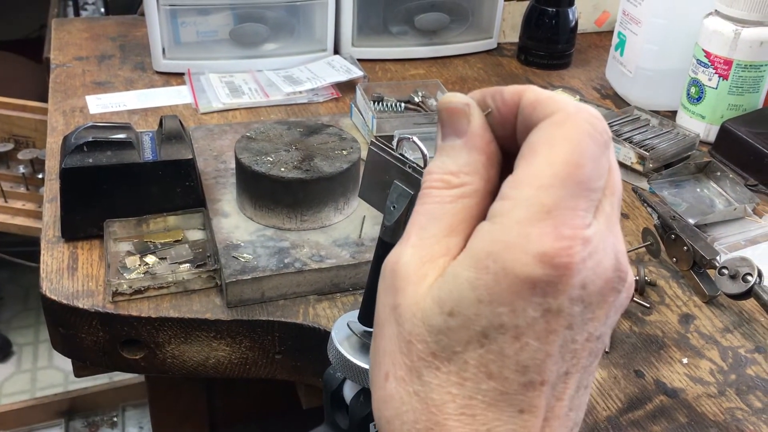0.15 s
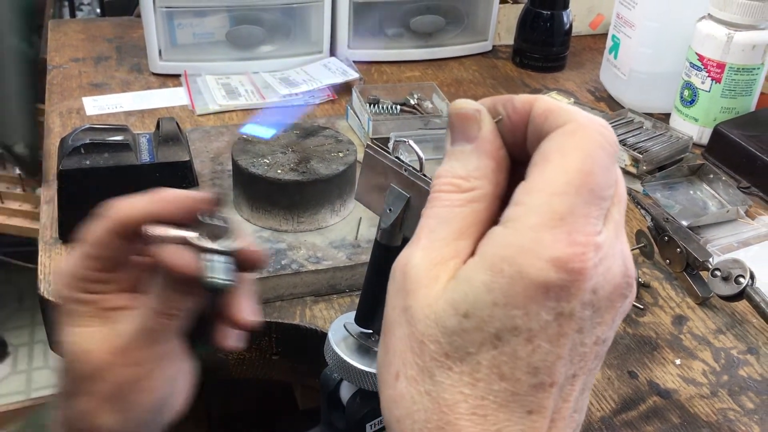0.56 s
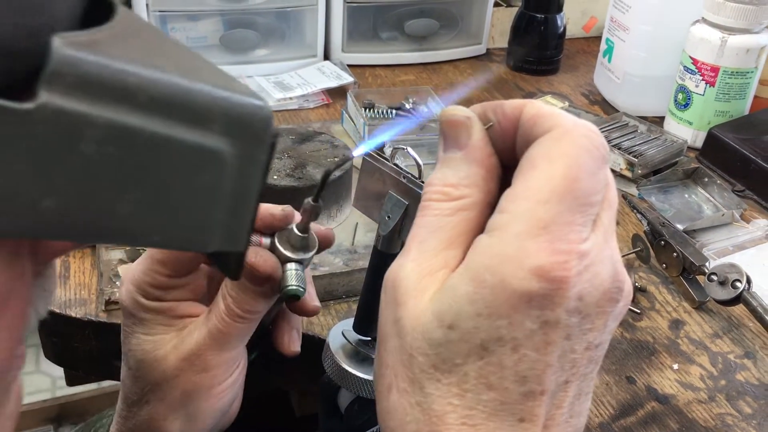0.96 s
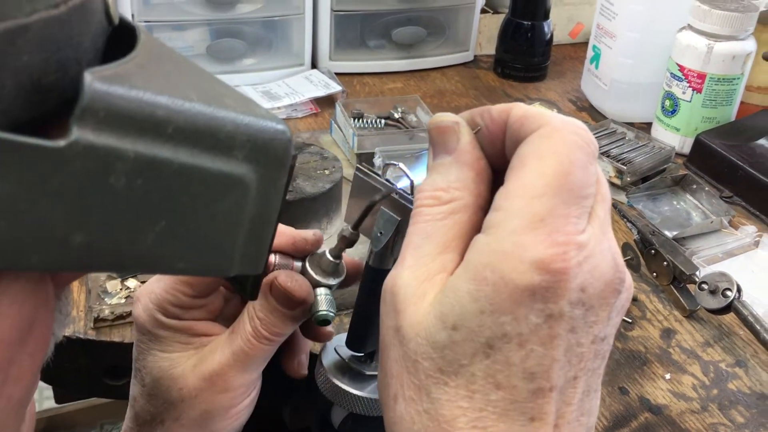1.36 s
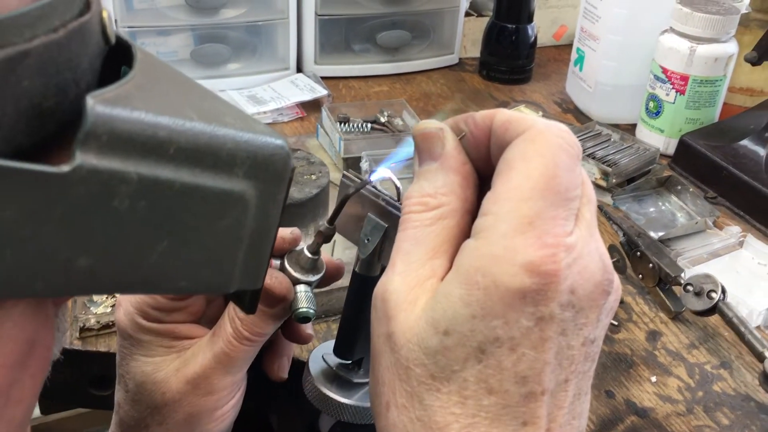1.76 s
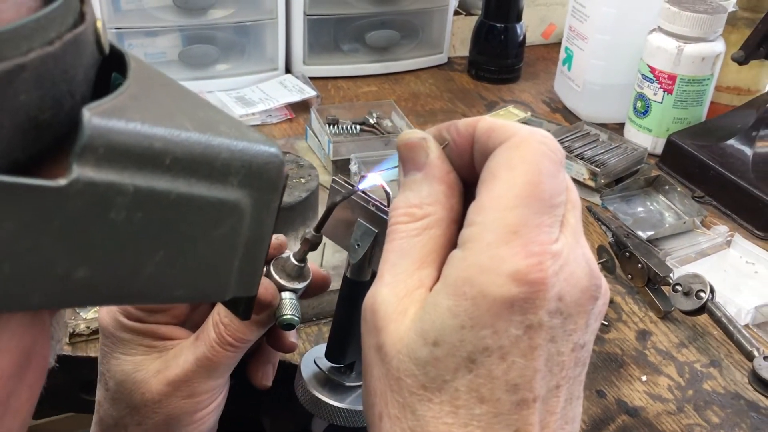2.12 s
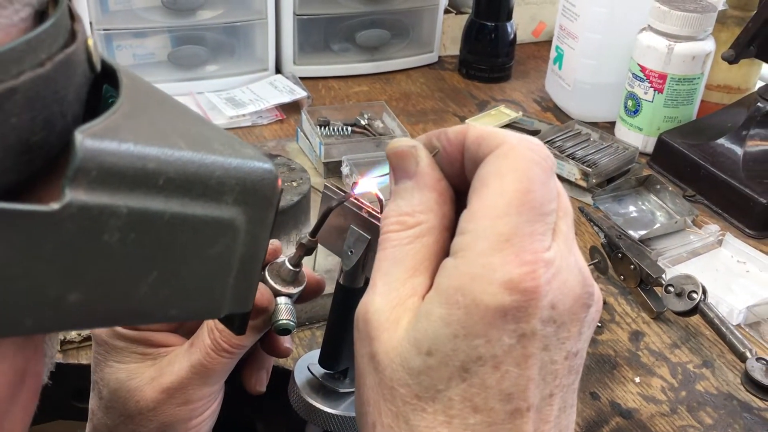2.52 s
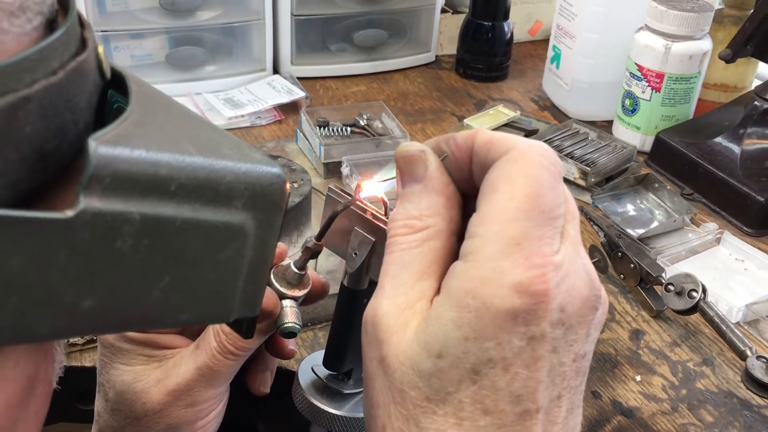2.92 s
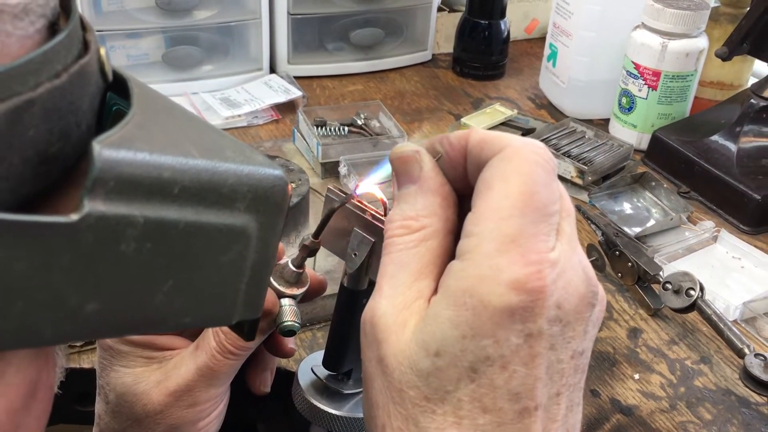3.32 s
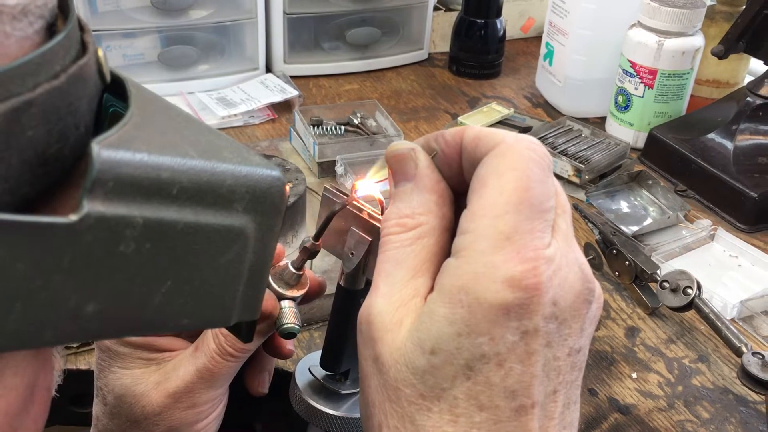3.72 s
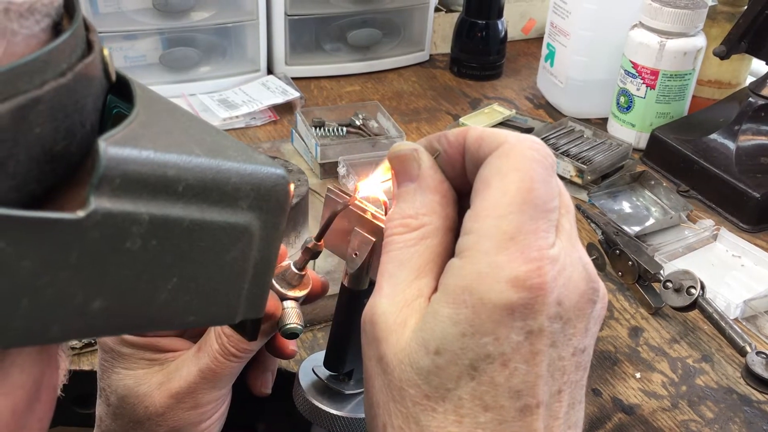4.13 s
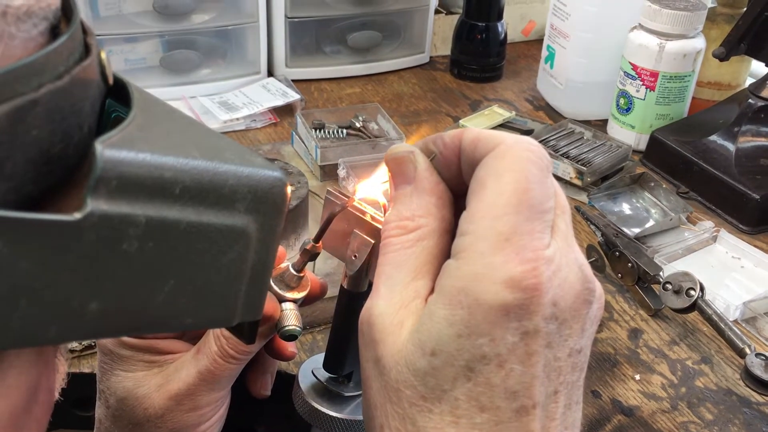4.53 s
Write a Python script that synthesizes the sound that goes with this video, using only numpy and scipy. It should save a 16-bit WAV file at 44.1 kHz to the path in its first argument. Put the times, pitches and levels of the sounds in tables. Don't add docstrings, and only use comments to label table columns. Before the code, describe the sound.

Steady, sharp rushing of burning gas, nearly white and rich in treble, in a small workshop heard close up. It starts already running, gets brightly louder around half a second with a phasing sweep, drops slightly when the flame meets the metal, then stays almost constant. Low combustion flutter builds faintly, with small dull pops around two seconds and several after three. Barely audible low room hum.

```python
import sys
import numpy as np
from scipy import signal
from scipy.fft import rfft, irfft
from scipy.io import wavfile
from scipy.ndimage import uniform_filter1d

SR = 44100
rng = np.random.default_rng(int(sys.argv[2]) if len(sys.argv) > 2 else 0)


def wav_record(signal):
    frames = np.transpose(np.atleast_2d(signal))
    bounded = np.clip(frames, -1, 1)
    quanta = np.round(bounded * 32767).astype(np.int16)
    wavfile.write(sys.argv[1], SR, quanta)


def invert_db(level):
    return 10 ** (np.asarray(level, dtype=float) / 20)


N = 206167
FRAME, HOP = 2048, 512
HZ = np.fft.rfftfreq(FRAME, 1 / SR)
TIMES = np.arange(N // HOP + 5) * HOP / SR

# (time [s], level [dB])
JET_LEVEL = [(0.0, -27), (0.13, -25.5), (0.65, -21.5), (0.69, -23), (0.88, -22.5), (1.31, -25),
             (1.95, -23.5), (3.69, -24.5), (4.67, -24)]
# (frequency [Hz], density [dB per Hz])
JET_COLOUR = [(300, -40), (700, -28), (1000, -21), (1500, -19), (2200, -15), (3500, -10), (5000, -5),
              (6500, -4.5), (8500, 0), (10000, -8), (11500, -5), (13500, -7.1), (15600, -4.4)]
# (frequency [Hz], density [dB per Hz])
ROAR_COLOUR = [(100, -23), (170, 4.5), (330, 7.5), (480, 3), (650, 7), (900, -3), (1300, 3), (1800, -5),
               (2600, -12.5)]
# (delay [ms], gain [ratio], path change sideways [mm per mm], path change forwards [mm per mm])
ECHOES = [(0.26, -0.25, -0.37, 0.51), (0.3667, 1.568, -0.42, -1.32), (0.3676, -1.714, -0.43, -1.1),
          (0.5589, -0.147, -0.6, 0.39), (0.6395, 0.18, 0.2, 1.88), (0.7139, 0.078, -0.56, 1.67),
          (0.8088, -0.543, -0.07, -0.33), (0.8127, 0.624, -0.02, -0.25), (0.9505, 0.084, -0.07, 1.35),
          (1.1211, 0.077, 0.56, -0.0), (1.1685, 0.093, 1.79, 0.79), (1.3115, 0.129, -0.05, 0.43),
          (1.5119, 0.084, -1.17, -1.53), (1.6198, 0.062, -0.04, 0.17), (1.727, 0.074, -0.92, 1.03),
          (2.0319, 0.062, 0.45, 1.37), (2.126, 0.081, 1.01, 0.52), (2.3821, 0.083, -0.5, 2.12),
          (2.4369, 0.096, -2.04, 2.04), (2.6476, -0.171, -0.34, 0.59), (2.7549, -0.079, -2.79, -0.31),
          (2.8021, -0.126, -2.36, 0.25), (2.8823, 0.066, -0.54, 0.55), (2.96, -0.148, -0.03, 1.21),
          (3.0206, -0.126, 0.53, 1.32), (3.0804, -0.087, 1.51, -0.87), (3.3932, -0.084, 0.28, 2.05),
          (4.7429, 0.065, 1.17, -0.21), (5.4014, -0.044, 0.71, 1.27), (6.5576, 0.039, -0.05, -0.49)]
# (start [s], end [s], first delay [ms], gain [ratio], slide [ms per s])
SWING = [(0.0, 0.98, 0.31, 0.102, 0.0), (0.0, 0.98, 0.359, -0.122, 0.04), (0.0, 1.12, 0.382, -0.057, 0.08),
         (0.0, 1.19, 0.095, 0.083, 0.0), (0.0, 1.32, 0.247, -0.149, 0.02), (0.0, 1.32, 1.44, -0.058, 0.0),
         (0.07, 1.26, 0.184, -0.059, 0.18), (0.14, 0.77, 0.437, -0.102, -0.6),
         (0.21, 0.7, 0.585, -0.079, -0.6), (0.21, 1.32, 0.166, 0.054, 0.02),
         (0.28, 1.32, 1.321, 0.06, -0.12), (0.35, 0.56, 0.934, -0.14, 1.44),
         (0.35, 1.32, 0.726, 0.08, -0.02), (0.49, 1.12, 2.459, 0.075, -0.14),
         (0.7, 1.19, 3.04, 0.098, -0.12), (0.7, 1.26, 0.584, -0.132, -0.02),
         (0.7, 1.32, 0.663, 0.084, -0.06), (0.7, 1.32, 0.927, 0.073, -0.08),
         (0.7, 1.32, 2.558, -0.13, -0.06), (0.77, 1.26, 0.996, 0.091, -0.04),
         (0.98, 1.19, 1.184, 0.145, -0.16), (1.05, 1.32, 0.127, -0.169, -0.06), (.42, .7, .22, .13, -.62),
         (.14, .37, .8, -.09, .6)]
# (time [s], lag [ms])
LAG = [(0, .17), (.22, .41), (.35, .4), (.55, .31), (.72, .11), (.95, .06), (1.4, 0)]
# (time [s], low [Hz], high [Hz], level [dB])
SPLITS = [(.3, 5180, 6400, -35), (.3, 9600, 11800, -33), (.86, 4200, 5150, -37), (.86, 11700, 13200, -36),
          (2.81, 6740, 8350, -37), (3.135, 4200, 5650, -37), (3.345, 6840, 8400, -37),
          (3.576, 4170, 6260, -37), (3.901, 9600, 10900, -37), (4.505, 11000, 12460, -36),
          (4.645, 4240, 5130, -37)]
# (time [s], frequency [Hz], lift [dB])
HOLLOW = [(.58, 5230, -6), (.65, 5500, 6), (.75, 5750, 5.5), (.85, 6400, 8), (1.0, 6250, 8),
          (1.08, 6300, -4)]
# (time [s], peak level [dB], pitch [Hz])
POPS = [(2.003, -42, 1080), (2.527, -63, 366), (2.677, -44.5, 300), (2.797, -44.5, 270), (3.263, -34, 1320),
        (3.349, -48, 1260), (3.887, -35, 1160), (4.098, -38, 1070), (4.144, -36.5, 1110)]
# (frequency [Hz], density [dB per Hz])
SHOP_COLOUR = [(15, -35), (30, -14), (45, -20), (58, 7.5), (80, -2), (110, 3), (200, 0.5), (400, -7.5),
               (900, -20), (2000, -40)]
# (from [mm], to [mm], middle [s], spread [s])
CREEP = (-3.3, 2.0, 2.7, .3)
# (amplitude [mm], period [s], crest [s])
SWAY = (1.1, 1.05, 2.25)


def evened(x):
    return x / np.sqrt(np.mean(abs(x) ** 2) + 1e-20)


def colour(points):
    hz, db = np.transpose(points)
    return invert_db(np.interp(np.log(HZ + 1), np.log(hz + 1), db))


def curves(rows, t=TIMES):
    s, *columns = np.transpose(rows)
    return [np.interp(t, s, column) for column in columns]


def noise(gain):
    spectra = rng.standard_normal((len(TIMES), len(HZ), 2)) @ [1, 1j]
    sound = signal.istft((spectra * gain).T, nperseg=FRAME, noverlap=FRAME - HOP)[1]
    return evened(sound[:N])


def flicker(top_hz):
    return evened(signal.lfilter(*signal.butter(1, top_hz, fs=SR), rng.standard_normal(N)))


def delayed(ms, gains):
    phase = (-2 * np.pi / 1000 * ms[:, None, :] * HZ[:, None]).astype(np.float32)
    return np.cos(phase) @ gains + 1j * (np.sin(phase) @ gains)


def jet(patchy_db=0.6, flutter_db=0.46, flutter_hz=14, shade_hz=4300, hollow_width_hz=107):
    level_db, = curves(JET_LEVEL, np.arange(N) / SR)
    lag, = curves(LAG)
    tilt_db_per_octave = -0.1 + 3.5 * lag
    tilt = np.outer(tilt_db_per_octave, np.log2(np.clip(HZ, 800, None) / 7000))
    open_s, open_spread_s = 0.42, 0.11
    shade_db = -0.47 + np.exp(-((TIMES - open_s) / open_spread_s) ** 2)
    shade = np.outer(shade_db, 1 / (1 + (HZ / shade_hz) ** 6))
    hollow_hz, lift_db = curves(HOLLOW)
    hollow = lift_db[:, None] * np.exp(-((HZ - hollow_hz[:, None]) / hollow_width_hz) ** 2)
    patches = rng.standard_normal((len(TIMES), len(HZ)))
    patches = uniform_filter1d(patches, size=6, axis=0)
    patches = evened(uniform_filter1d(patches, size=60, axis=1))
    field = colour(JET_COLOUR) * invert_db(tilt + shade + hollow + patchy_db * patches) * abs(bench())
    field /= np.sqrt(uniform_filter1d((field ** 2).mean(1), size=9))[:, None]
    return invert_db(level_db + flutter_db * flicker(flutter_hz)) * noise(field)


def bench():
    lag, = curves(LAG)
    near = work_reflections(lag) + swing_reflections()
    slid = np.exp(-2j * np.pi / 1000 * np.outer(lag, HZ))
    return (1 + near) * (1 + scatter(lag) * slid)


def work_reflections(lag, settle_s=1.32, blend_s=0.09, far_hz=7000):
    creep_from, creep_to, creep_s, creep_spread_s = CREEP
    sideways = creep_from + (creep_to - creep_from) / (1 + np.exp((creep_s - TIMES) / creep_spread_s))
    sway_mm, period_s, crest_s = SWAY
    forwards = sway_mm * np.cos(2 * np.pi * (TIMES - crest_s) / period_s)
    ms, gains, per_side, per_fore = np.transpose(ECHOES)
    path_mm = np.outer(sideways, per_side) + np.outer(forwards, per_fore)
    at_rest = delayed(ms + path_mm / 343, gains)
    far = ms > 2
    away = delayed(ms[far] + lag[:, None], gains[far]) / (1 + (HZ / far_hz) ** 2)
    settled = np.clip((TIMES - settle_s) / blend_s + 0.5, 0, 1)[:, None]
    return settled * at_rest + (1 - settled) * away


def swing_reflections(swing_gain=1.25, blend_s=0.09):
    total = np.zeros((len(TIMES), len(HZ)), complex)
    for start, end, first_ms, gain, slide in SWING:
        since_start = TIMES - start + (start == 0)
        share = np.clip(np.minimum(since_start, end - TIMES) / blend_s + 0.5, 0, 1)
        now = share > 0
        ms = first_ms + slide * (TIMES[now, None] - start)
        total[now] += swing_gain * share[now, None] * delayed(ms, np.array([gain]))
    return total


def scatter(lag, late_db=-8, start_ms=3.5, t60=0.08, turns_per_m=25):
    t = np.arange(FRAME) / SR
    tails = rfft(rng.standard_normal((6, FRAME)) * invert_db(-60 * t / t60) * (t > start_ms / 1000))
    travel_m = 0.425 * np.cumsum(abs(np.gradient(lag))) + 0.004 * TIMES
    turns = np.outer(travel_m * turns_per_m, rng.uniform(0.2903, 1, 6)) + rng.random(6)
    return invert_db(late_db) * evened(np.cos(2 * np.pi * turns) @ tails)


def shop(room_db=-59.5, hum_db=-67, hum_hz=129, hum_width_hz=7.1):
    hum = noise(1 / (1 + ((HZ - hum_hz) / hum_width_hz) ** 4))
    return invert_db(room_db) * noise(colour(SHOP_COLOUR)) + invert_db(hum_db) * hum


def roar(lumpy_db=3.0, lump_hz=90):
    t = np.arange(N) / SR
    nearing_db = 8 * np.exp(-t / 0.13)
    wrapping_db = 12 * np.exp(-t / 1.33)
    lumps = evened(noise(colour(ROAR_COLOUR)) * invert_db(lumpy_db * flicker(lump_hz)))
    return invert_db(-50.5 - nearing_db - wrapping_db) * lumps


def pops(cycles=0.8, boost_db=3, sharp=1.5, fall=0.45, build_s=0.0028):
    out = np.zeros(N + SR)
    for s, db, hz in POPS:
        u = np.arange(0, 5, sharp * hz / SR)
        phase = 2 * np.pi * np.log1p(fall * u) / fall
        envelope = u / cycles * np.exp(1 - u / cycles)
        out[round((s + build_s) * SR):][:len(u)] += invert_db(db + boost_db) * np.sin(phase) * envelope
    return out[:N]


def scene():
    mono = jet() + shop() + roar() + pops()
    return np.array([mono, mono])


def top_cut(x):
    return signal.sosfilt(signal.butter(12, 16860, fs=SR, output="sos"), x)


def record(dry, edge_hz=15715):
    side = np.zeros(N + FRAME)
    for s, low_hz, high_hz, db in SPLITS:
        band = (HZ > low_hz) * (HZ < high_hz)
        burst = evened(irfft(rfft(rng.standard_normal(FRAME)) * band))
        side[round(s * SR) - FRAME // 2:][:FRAME] += invert_db(db) * burst * np.hanning(FRAME) ** 2
    wide = dry + np.outer([1, -1], side[:N])
    low_pass = signal.firwin(2001, edge_hz, window=("kaiser", 10), fs=SR)
    mix = signal.oaconvolve(wide, low_pass[None], "same")
    return top_cut(mix)


dry = scene()
out = record(dry)
wav_record(out)
```